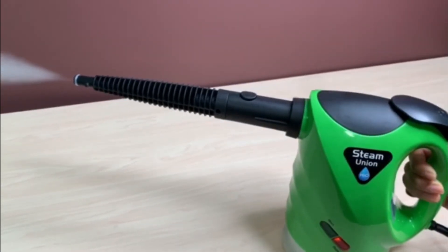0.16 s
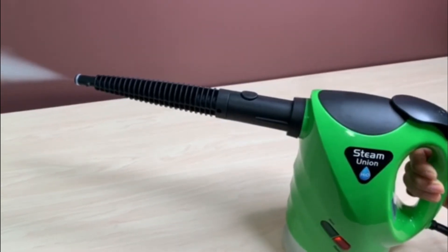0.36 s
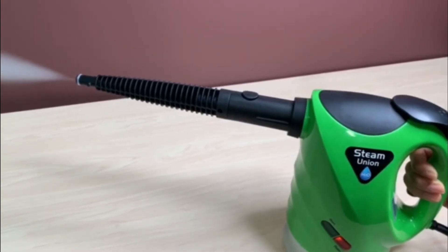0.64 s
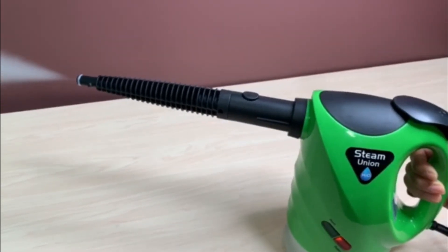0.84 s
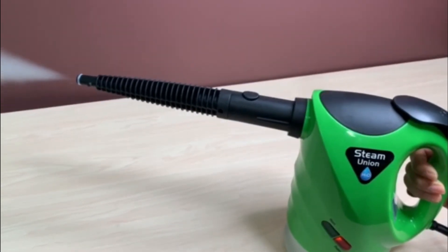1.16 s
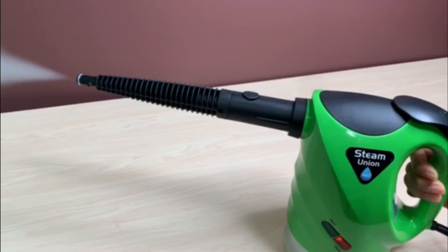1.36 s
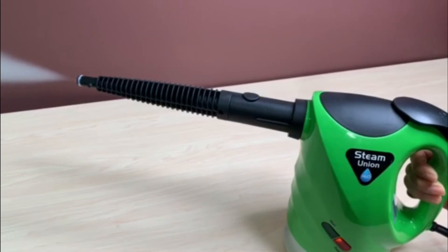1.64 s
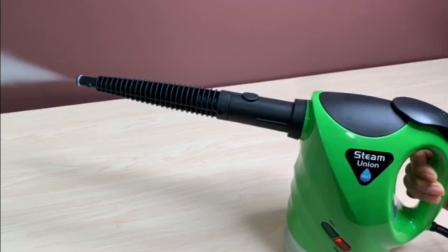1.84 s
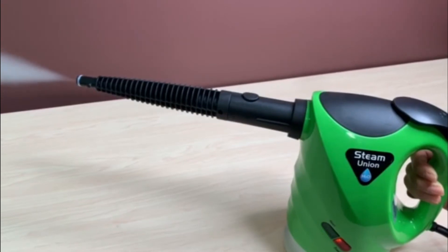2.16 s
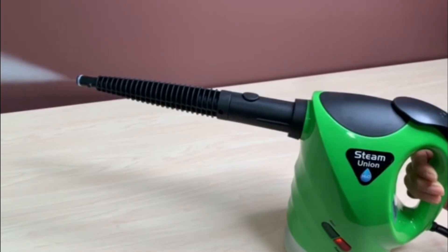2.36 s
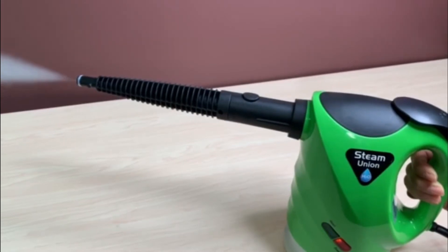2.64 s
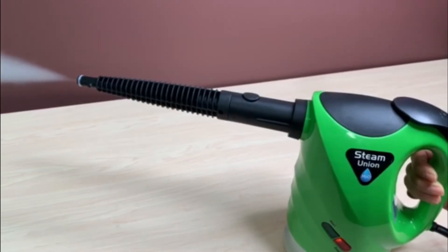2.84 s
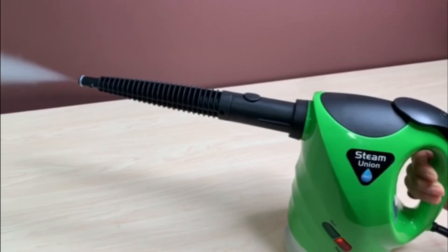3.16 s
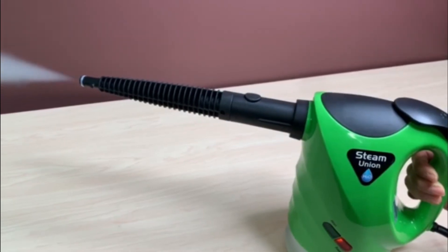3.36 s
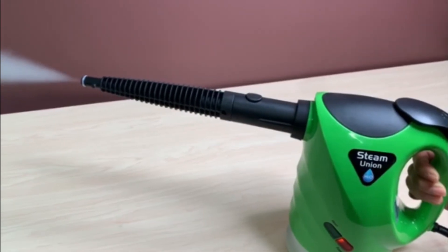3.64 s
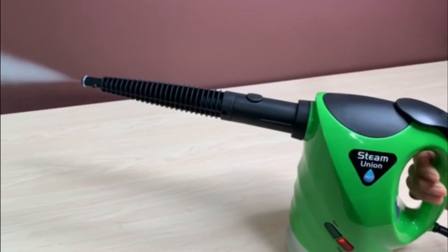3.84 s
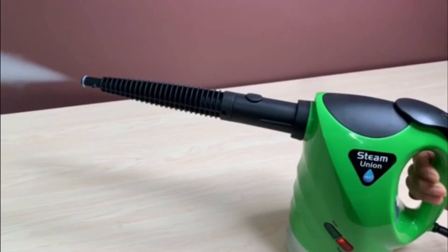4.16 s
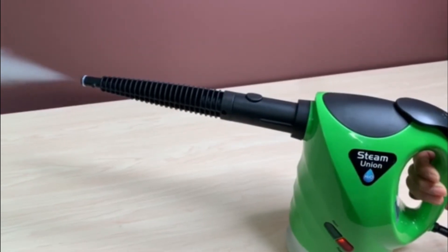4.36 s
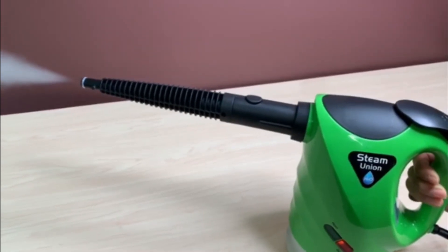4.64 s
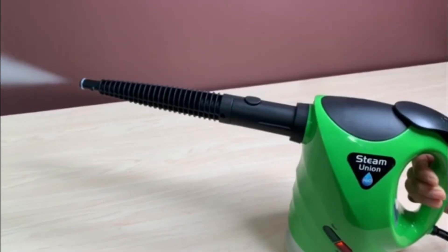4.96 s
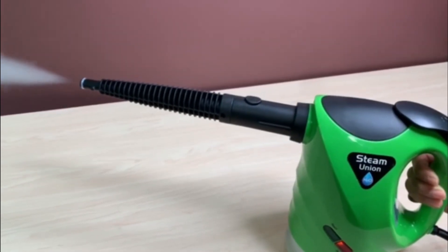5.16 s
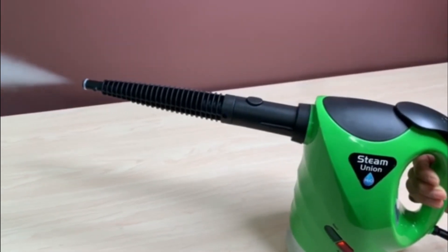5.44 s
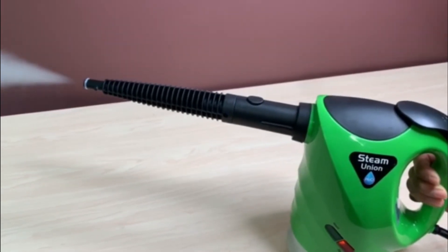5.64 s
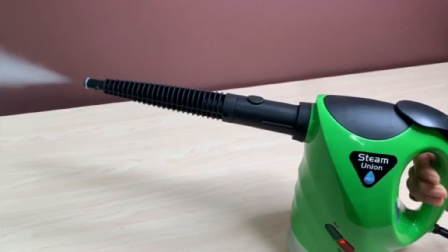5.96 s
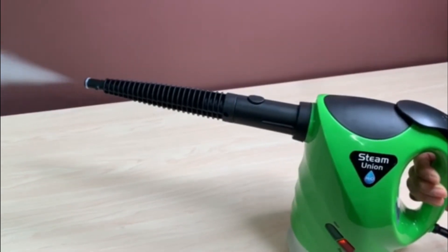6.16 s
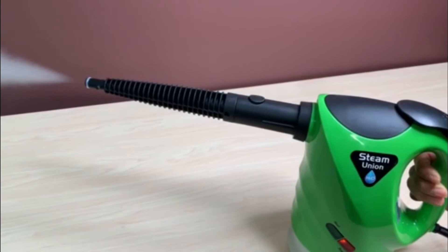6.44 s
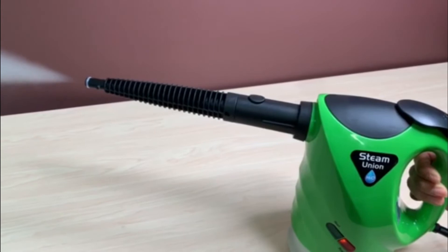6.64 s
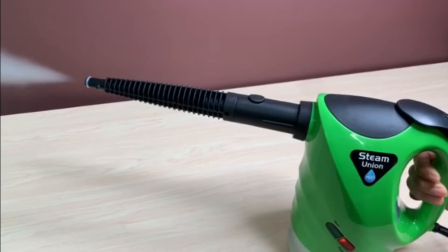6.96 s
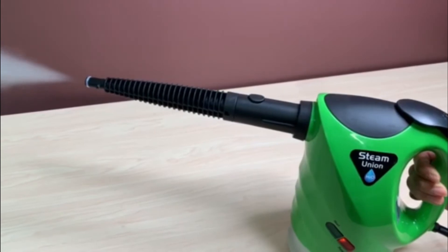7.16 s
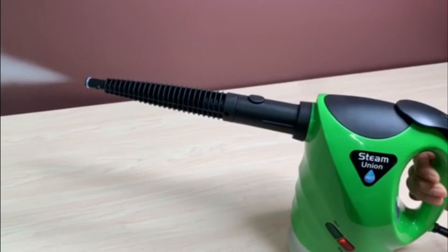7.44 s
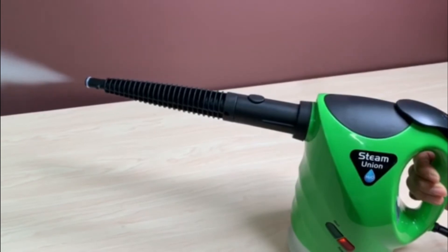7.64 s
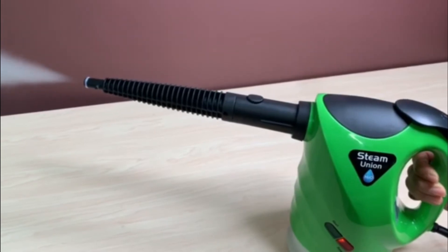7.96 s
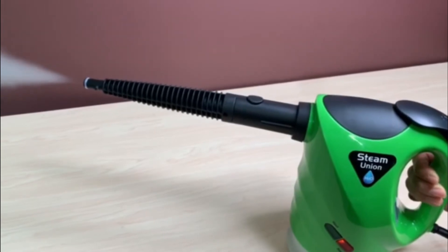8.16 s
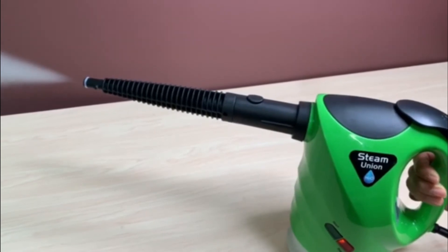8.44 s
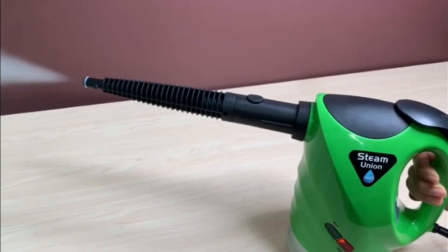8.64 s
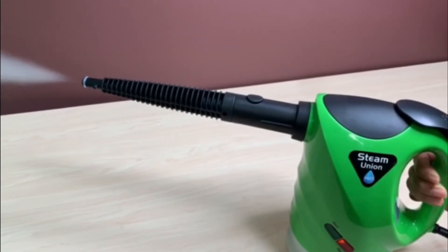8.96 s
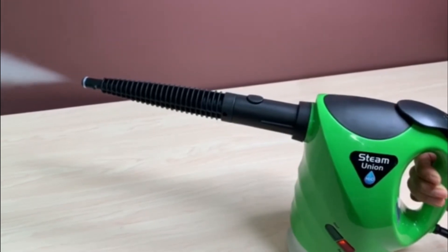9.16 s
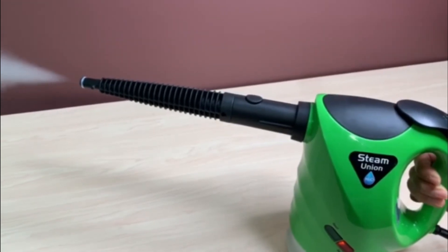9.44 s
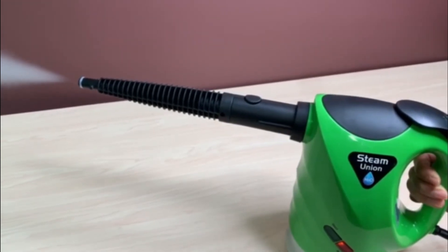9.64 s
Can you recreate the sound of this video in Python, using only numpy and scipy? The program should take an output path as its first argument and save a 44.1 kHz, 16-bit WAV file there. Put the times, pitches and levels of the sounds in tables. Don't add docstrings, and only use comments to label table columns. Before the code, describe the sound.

A continuous jet of steam hisses from a narrow nozzle, already running at the start and never stopping. The sound is thin, airy and very bright, with a fainter duller roar returning off the wall. It swells slightly between two and four seconds, then settles a little quieter and smoother. Soft deep thumps barely show underneath. Small quiet room, close stereo microphone.

```python
import sys
import numpy as np
from scipy import signal
from scipy.fft import rfft, irfft, next_fast_len
from scipy.io import wavfile
from scipy.ndimage import uniform_filter1d, map_coordinates

SR = 44100
rng = np.random.default_rng(int(sys.argv[2]) if len(sys.argv) > 2 else 0)


def voltage_ratio(decibels):
    exponent = np.asarray(decibels, float) / 20
    return 10 ** exponent


def transcribe(signal):
    frames = np.atleast_2d(signal).T
    limited = np.clip(frames, -1, 1)
    pcm = np.round(limited * 32767).astype(np.int16)
    wavfile.write(sys.argv[1], SR, pcm)


N = 431738

# frequency in Hz, level in dB.
RUMBLE_COLOUR = [(12, -40), (20, -17), (31, 7.5), (49, 0), (97, -0.5), (140, -8), (173, -0.5), (200, -2.5),
                 (260, -23), (440, -120)]
# start in seconds, peak level in dB, pitch in Hz, time to fade 60 dB in seconds.
THUMP_EVENTS = [
    (0.0, -49, 44.6, .6),
    (2.7, -53, 60, .3),
    (3.56, -67, 50, .3),
    (5.599, -53, 96, 0.32),
    (5.66, -51, 65, .3),
    (6.75, -40, 46.7, .5),
    (6.76, -51, 122, .3),
    (6.799, -35, 44.4, .45),
    (6.83, -55, 80, .5),
    (6.95, -46, 55, 0.27),
]
# frequency in Hz, time to fade 60 dB in seconds.
ROOM_FADE = [(200, 0.96), (2000, 0.4837), (8000, 0.04), (15000, 0.94)]
# frequency in Hz, echo over direct sound in dB.
ROOM_ECHO = [(100, -12), (500, -10), (1000, 0), (1600, 1), (3300, 11), (5300, 12), (6150, 1), (7500, 8),
             (8600, -1.5), (9200, 3), (10300, -4.5), (12000, -9.5), (15000, -9)]
# frequency in Hz, level in dB.
HISS_COLOUR = [(5000, -40), (7500, -14), (8050, -6), (8600, -6), (9050, -12), (9600, -8.5), (10400, -4),
               (10800, -6), (11300, -2.5), (12300, -2), (13400, -4), (14500, -2.5), (15650, .5),
               (17000, .5)]
# frequency in Hz, level in dB.
ROAR_COLOUR = [(1200, -19.5), (1600, -13), (2100, -11.5), (2650, -12.5), (3000, -13.5), (3600, -11),
               (4500, -10.5), (5300, -9.5), (6100, -3), (6700, -1.5), (7400, -5), (8200, -10), (9000, -28),
               (11000, -52)]
# frequency in Hz, level in dB.
RUSH_COLOUR = [(100, -34), (170, -7.5), (250, -7), (400, -2.5), (520, -3.5), (620, -4.5), (850, -4),
               (1000, -5.5), (1300, -3), (1600, -9.5), (2200, -44)]
# time in seconds, level in dB.
PRESSURE = [(0, -29), (.3, -28.5), (1.2, -28.5), (1.55, -29), (1.95, -28.5), (2.18, -29), (2.3, -26),
            (2.57, -26.5), (2.65, -29.5), (3.1, -26), (3.27, -27), (3.35, -29.5), (3.85, -27.5),
            (4.25, -29.5), (5.5, -31), (6.45, -31), (7.1, -30.5), (9.79, -31)]
# time in seconds, change of hiss in dB, length in seconds.
WATER_CHOKES = [(0.084, -1, 0.076), (0.485, -2, 0.046), (0.852, -2.5, 0.037), (1.08, -2.5, 0.039),
                (1.426, -1, .04), (1.63, -1, .07), (2.444, -0.5, .05), (3.179, -2, 0.024),
                (3.387, -1, 0.14), (3.613, -1.5, 0.027), (3.726, -1.5, .04), (4.055, -1.4, 0.074),
                (4.27, -1.5, 0.077), (4.53, -0.97, 0.29), (5.5, 0.5, 0.026), (6.475, 0, 0.041),
                (9.19, 1.5, 0.036), (9.678, -0.5, .06)]
# frequency in Hz, lead in turns of phase.
NOZZLE_LEAD = [(5600, -1.5), (8760, -2.5), (10250, -3), (11850, -3.5), (13430, -4), (14970, -4.5),
               (16600, -5)]
# frequency in Hz, lead in turns of phase.
WALL_LEAD = [(0, 0), (700, .1), (1200, .24), (1620, .5), (2750, 1), (3500, 1.5), (4300, 2), (5150, 2.5),
             (6150, 3), (9000, 4.2)]
# time in seconds, extra left lead
PHASE_SWAY = [
    (0, 0),
    (1.6, -.03),
    (1.75, .01),
    (3.4, -.01),
    (3.8, .015),
    (4.45, .03),
    (5.7, .025),
    (6.8, 0),
    (8.2, -.01),
    (9.79, 0),
]
# frequency in Hz, width in Hz, level of the added resonance
# against the plain sound in dB.
STANDING_WAVES = [(620, 40, -4), (735, 50, 2), (1160, 40, -3), (2000, 60, -4), (2660, 120, -4),
                  (3655, 40, -3), (6480, 60, -9), (6790, 60, -4), (6885, 40, -4), (7290, 45, -1),
                  (8022, 48, 2), (8185, 35, -4), (8590, 50, -5), (10930, 60, -6), (11140, 50, -3),
                  (11650, 50, -5), (12290, 50, -4), (13128, 45, -5), (14180, 60, -6), (15705, 60, -7)]
# frequency in Hz, width in Hz, depth from 0 to 1.
TABLE_NOTCHES = [(525, 70, .7), (660, 40, .6), (815, 50, .5), (2850, 150, .5)]
# frequency in Hz, left over right in dB.
PORT_BALANCE = [(60, -1.0), (110, 4), (200, -0.5), (380, 0.5), (700, 4), (1290, 3), (2380, 0.5), (4400, -1),
                (8120, -2.5), (15000, 0.5)]
# frequency in Hz, level against its partner in dB.
STEREO_LIMIT = [(4000, -30), (5800, -8), (8000, -6.5), (11800, -5), (13400, -6), (14700, -4), (15600, -4)]
# time in seconds, rise of that limit in dB.
NARROW_SPELL = [
    (3.5, 0),
    (4.45, 3.2),
    (4.8, 1.5),
    (5.68, 3.2),
    (5.78, .5),
    (6.6, 0),
]


def unit(x):
    return x / np.sqrt(np.mean(x ** 2) + 1e-20)


def along(points, hz):
    f, value = np.transpose(points)
    return np.interp(np.log(hz + 1), np.log(f + 1), value)


def over_time(points):
    return np.interp(np.arange(N) / SR, *np.transpose(points))


def wobble(rate):
    points = rng.standard_normal(int(N * rate / SR) + 4)
    return map_coordinates(points, [np.arange(N) * rate / SR])


def filtered(x, response):
    m = next_fast_len(N + SR // 2)
    return irfft(rfft(x, m) * response(np.fft.rfftfreq(m, 1 / SR)), m)[..., :N]


def turbulence(colour, patchy_db):
    z = signal.stft(rng.standard_normal(N), nperseg=512)[2]
    patches = uniform_filter1d(rng.standard_normal(z.shape), size=8, axis=0)
    patches = uniform_filter1d(patches, size=10, axis=1)
    x = signal.istft(z * voltage_ratio(patchy_db * unit(patches)), nperseg=512)[1][:N]
    lowest_hz = colour[0][0]
    return unit(filtered(x, lambda hz: voltage_ratio(np.where(hz > lowest_hz, along(colour, hz), -120))))


def building():
    rumble_db, shake_db, shake_fade_s = -70, -32, 1.5
    t = np.arange(N) / SR
    level = voltage_ratio(rumble_db + 0.4 * wobble(2.36))
    thumps = 0
    for start, db, hz, fade_s in THUMP_EVENTS:
        age = np.clip(t - start, 0, 2)
        rise = 1 - np.exp(-age / 0.013)
        thumps = thumps + voltage_ratio(db - 60 * age / fade_s) * rise * np.sin(2 * np.pi * hz * age)
        shaking = voltage_ratio(db + shake_db - 60 * age / shake_fade_s) * rise
        level = np.hypot(level, shaking)
    shared = voltage_ratio(6.5) * level * turbulence(RUMBLE_COLOUR, patchy_db=1.2) + thumps
    apart = voltage_ratio(-12) * level * turbulence(RUMBLE_COLOUR, patchy_db=0.0)
    return voltage_ratio([[-1.3], [1.3]]) * shared + np.array([apart, -apart])


def room(x):
    hz, t, z = signal.stft(rng.standard_normal((2, 2, SR // 3)), SR, nperseg=256)
    fade = voltage_ratio(-60 * t / along(ROOM_FADE, hz)[:, None])
    tails = signal.istft(z * fade, SR, nperseg=256)[1]
    run_in = SR // 2
    source = np.pad(x, (run_in + 90, 0), 'wrap')[None, None]
    first, last = signal.fftconvolve(source, tails, axes=2)[..., run_in:run_in + N]
    turn = np.linspace(0, 7, N) + 0.3 * wobble(1.57)
    echo = np.cos(turn) * first + np.sin(turn) * last
    return filtered(unit(echo) * np.std(x), lambda hz: voltage_ratio(along(ROOM_ECHO, hz)))


def arrive(x, lead):
    f, turns = np.transpose(lead)
    sides = np.array([[1], [-1]])
    return filtered(x, lambda hz: np.exp(1j * np.pi * np.interp(hz, f, turns) * sides))


def surroundings(hz):
    def bell(centre, width):
        return 1j * hz * width / (centre * centre - hz * hz + 1j * hz * width)

    lifts = sum(voltage_ratio(db) * bell(centre, width) for centre, width, db in STANDING_WAVES)
    notches = sum(depth * bell(centre, width) for centre, width, depth in TABLE_NOTCHES)
    balance = voltage_ratio(along(PORT_BALANCE, hz) * np.array([[.5], [-.5]]))
    return balance * (1 + lifts - notches)


def jet():
    roar_db, rush_db = -12, -25
    dry_s, dry_flutter = 4.7, .55
    t = np.arange(N) / SR
    flow_db = over_time(PRESSURE)
    mean_db = flow_db.mean()
    swing_db = flow_db - mean_db
    choke_db = sum(db * np.exp(-2 * ((t - s) / length) ** 4) for s, db, length in WATER_CHOKES)
    wetness = np.interp(t, [dry_s - .3, dry_s + .3], [1, dry_flutter])
    flutter = (0.2 * wobble(9) + 0.44 * wobble(25)) * wetness

    hiss_level = voltage_ratio(flow_db + 6.5 + choke_db + 0.65 * flutter + 0.54 * wobble(150))
    roar_level = voltage_ratio(mean_db + roar_db + 1.32 * swing_db + 1.6 * choke_db + 1.92 * flutter)
    rush_level = voltage_ratio(mean_db + rush_db + 0.66 * swing_db + 3.4 * choke_db + 4.2 * flutter)
    hiss = hiss_level * turbulence(HISS_COLOUR, patchy_db=1.26)
    roar = roar_level * turbulence(ROAR_COLOUR, patchy_db=0.96)
    rush = rush_level * turbulence(RUSH_COLOUR, patchy_db=0.35)

    sway_turns = over_time(PHASE_SWAY) + .016 * wobble(8)
    sway = np.exp(1j * np.pi * sway_turns * np.array([[1], [-1]]))
    straight = signal.hilbert(arrive(hiss, NOZZLE_LEAD), next_fast_len(N))[:, :N]
    straight = (straight * sway).real
    off_wall = arrive(roar + rush, WALL_LEAD)
    return filtered(straight + off_wall + room(hiss + roar + rush), surroundings)


def scene():
    return jet() + building()


def narrow_stereo(x):
    hz, t, z = signal.stft([x[0] + x[1], x[0] - x[1]], SR, nperseg=2048)
    band = np.arange(len(hz)) // 12
    line_power = abs(z) ** 2
    power = uniform_filter1d(line_power, size=12, axis=1, origin=-6)[:, ::12]
    waver_db = 2.1 * rng.standard_normal(power.shape[1:])
    limit = power[::-1] * voltage_ratio(2 * waver_db + 2 * np.interp(t, *np.transpose(NARROW_SPELL)))
    kept = power > limit * voltage_ratio(2 * along(STEREO_LIMIT, hz[::12]))[:, None]
    tall = line_power > limit[:, band] * voltage_ratio(2 * 2.5)
    mid, side = signal.istft(z * (kept[:, band] | tall), SR, nperseg=2048)[1][:, :N] / 2
    return np.array([mid + side, mid - side])


def band_limit(x):
    return signal.sosfilt(signal.butter(12, 16090, fs=SR, output="sos"), x)


def record(dry):
    def microphone(hz):
        treble_cut = voltage_ratio(-.3 * np.clip(hz - 15730, 0, 300))
        return treble_cut / (1 + (38 / (hz + 1)) ** 5)

    mix = narrow_stereo(filtered(dry, microphone))
    return band_limit(mix)


dry = scene()
out = record(dry)
transcribe(out)
```